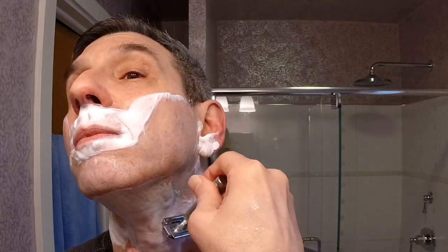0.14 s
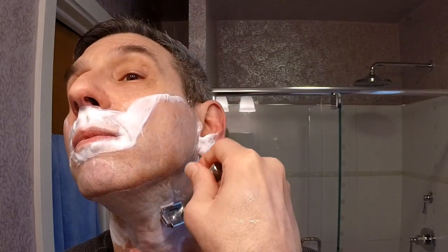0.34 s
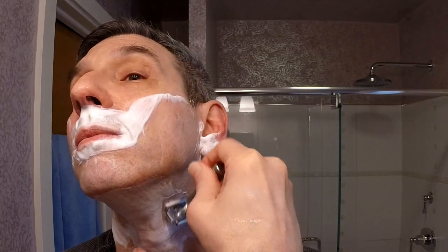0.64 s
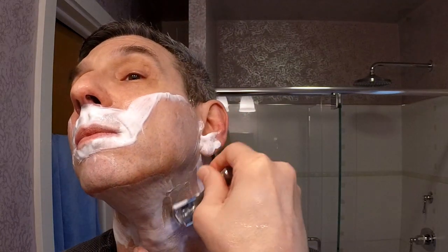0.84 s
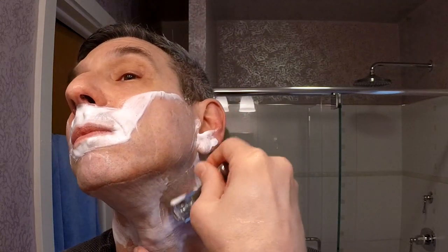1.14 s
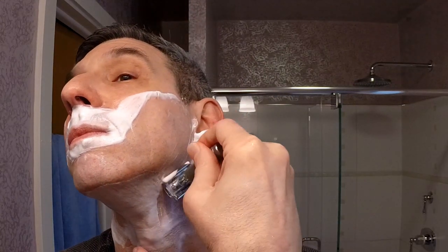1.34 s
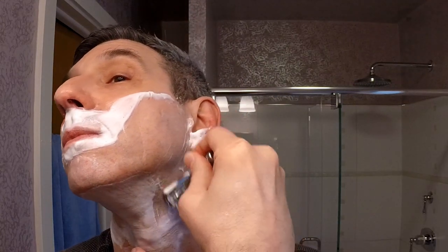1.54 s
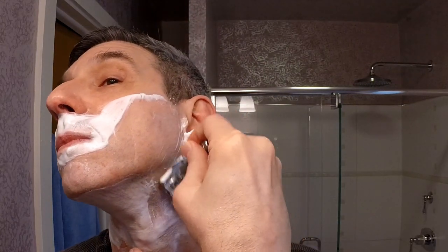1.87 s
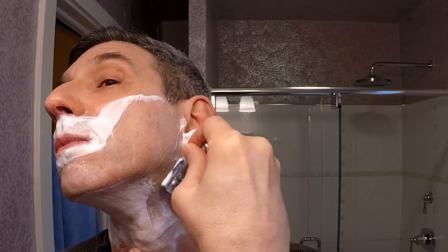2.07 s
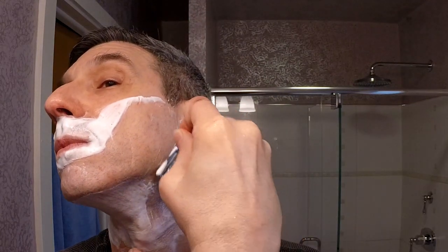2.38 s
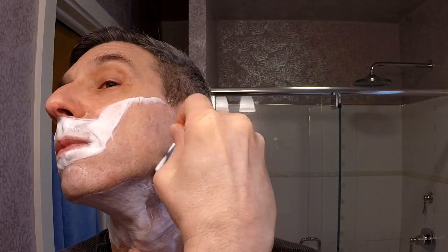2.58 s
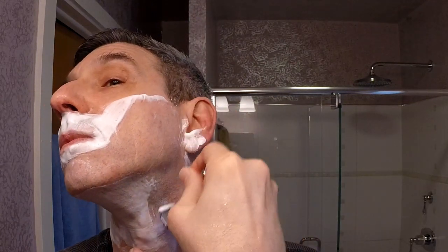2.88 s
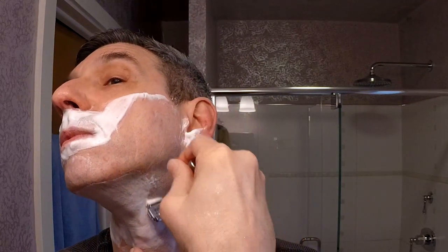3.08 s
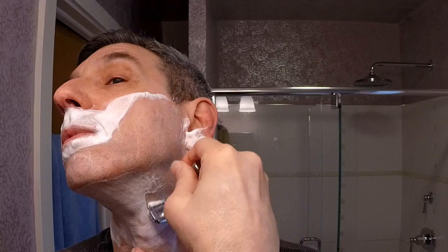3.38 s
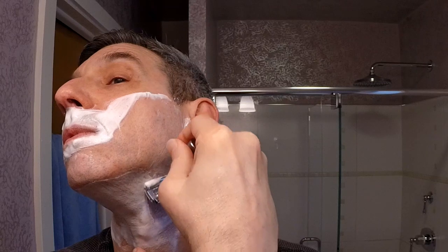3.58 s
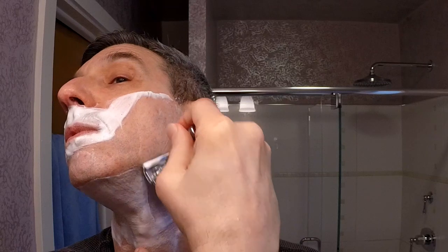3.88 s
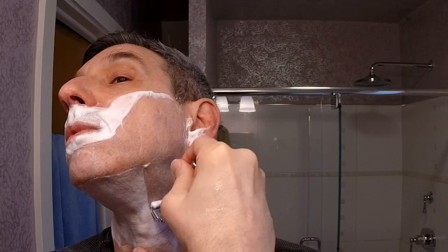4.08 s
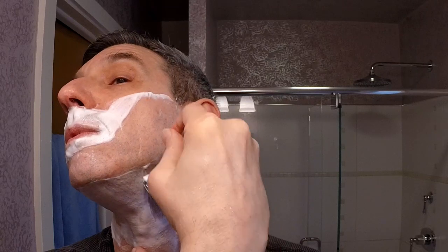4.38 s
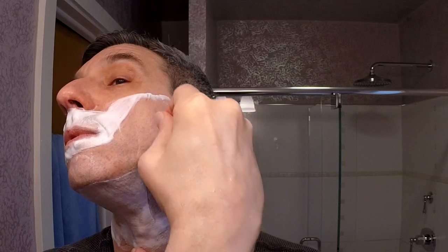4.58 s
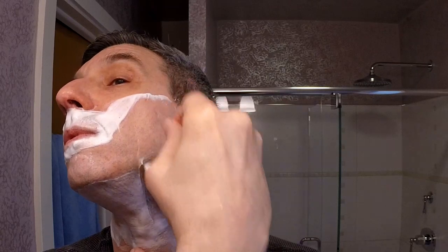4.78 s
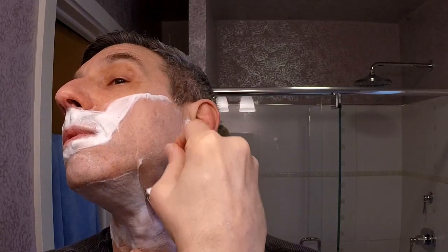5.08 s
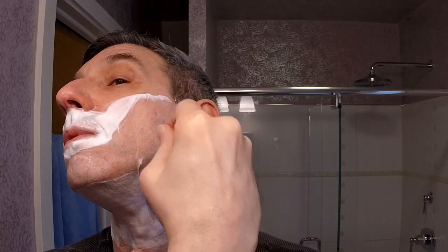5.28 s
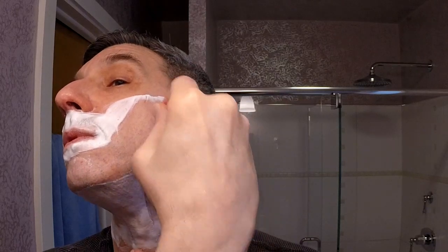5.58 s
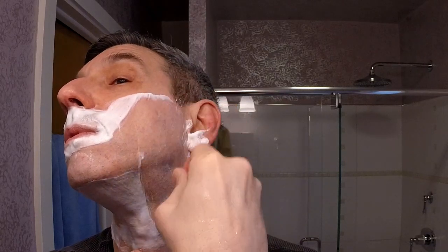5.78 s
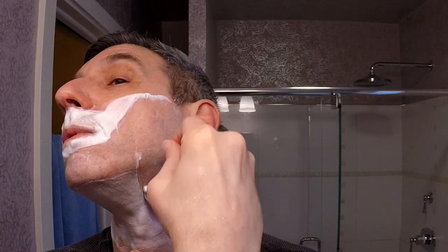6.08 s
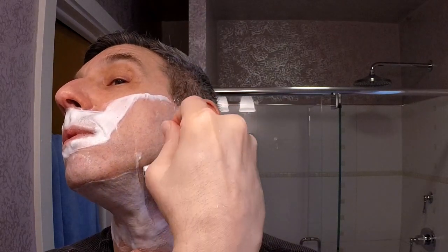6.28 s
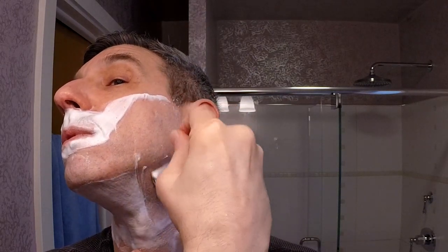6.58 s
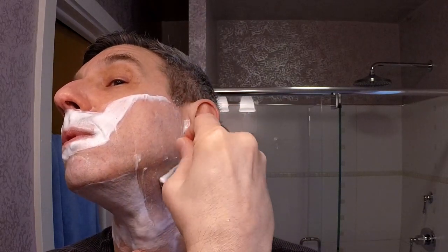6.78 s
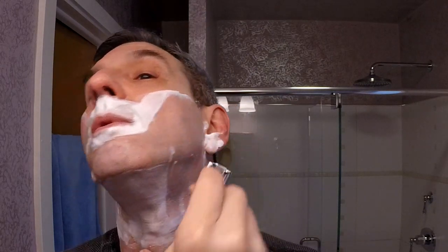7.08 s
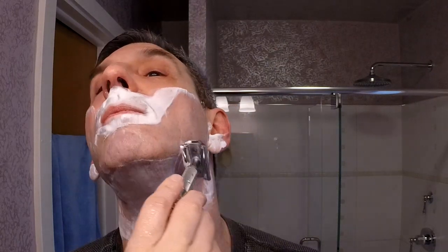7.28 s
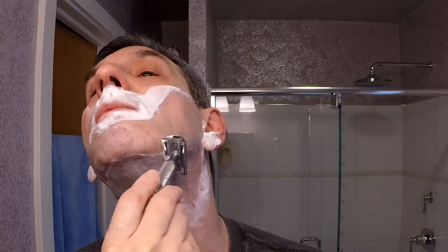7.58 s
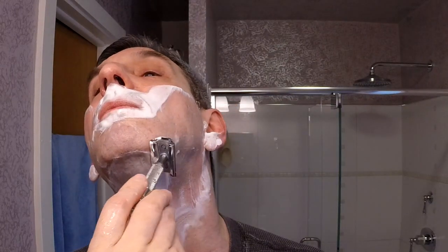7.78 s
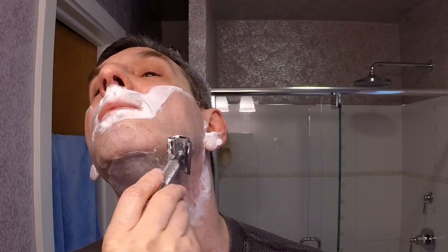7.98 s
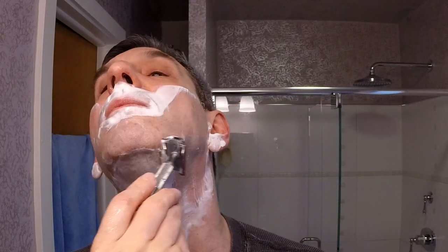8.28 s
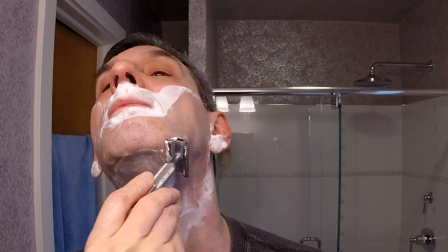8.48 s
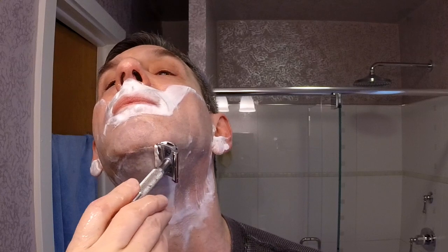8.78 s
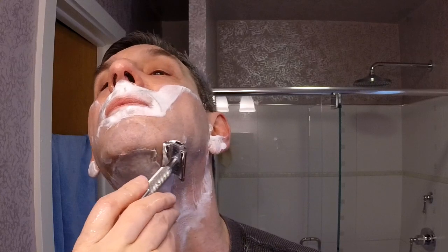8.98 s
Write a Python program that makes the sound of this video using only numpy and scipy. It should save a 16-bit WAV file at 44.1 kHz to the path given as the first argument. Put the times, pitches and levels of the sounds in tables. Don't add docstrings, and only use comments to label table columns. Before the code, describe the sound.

Crisp, dry razor scrapes, quick then drawn out, with tiny hair snaps and soft skin rubbing, over faint fan rumble and hiss in a small bathroom.

```python
import sys
import numpy as np
from scipy import signal
from scipy.fft import rfft, irfft, next_fast_len
from scipy.io import wavfile
from scipy.ndimage import uniform_filter1d, map_coordinates

SR = 44100
rng = np.random.default_rng(int(sys.argv[2]) if len(sys.argv) > 2 else 0)


def undo_db(level):
    steps = np.asarray(level, float) / 20
    return 10 ** steps


def output_pcm(signal):
    pcm = np.clip(np.atleast_2d(signal).T, -1, 1) * 32767
    wavfile.write(sys.argv[1], SR, np.round(pcm).astype(np.int16))


N = 403074
STEP_S = 0.002

# lower edge in Hz, upper edge in Hz.
ZONES_HZ = [(0, 2750), (2750, 4200), (4200, 6300), (6300, 10700), (10700, 30000)]


def unit(x):
    return x / np.sqrt(np.mean(x ** 2) + 1e-20)


def along(points, hz):
    f, v = np.transpose(points)
    return np.interp(np.log(hz + 1), np.log(f + 1), v)


def curves(rows):
    s, *cols = np.transpose(rows)
    return [np.interp(np.arange(N) / SR, s, c) for c in cols]


def per_sample(control):
    return np.interp(np.arange(N) / SR, np.arange(len(control)) * STEP_S, control)


def wobble(rate):
    knots = rng.standard_normal(int(N * rate / SR) + 4)
    return map_coordinates(knots, [np.arange(N) * rate / SR])


def coloured(x, db_at):
    size = 4096
    log_gain = np.log(undo_db(db_at(np.fft.rfftfreq(size, 1 / SR))) + 1e-6)
    cepstrum = irfft(log_gain, size)
    cepstrum[1:size // 2] *= 2
    cepstrum[size // 2 + 1:] = 0
    response = irfft(np.exp(rfft(cepstrum)), size)
    return signal.fftconvolve(x, response / np.linalg.norm(response))[:N]


def noise(spectrum):
    m = next_fast_len(N)
    gain = undo_db(along(spectrum, np.fft.rfftfreq(m, 1 / SR)))
    return unit(irfft(rfft(rng.standard_normal(m)) * gain, m)[:N])


def ventilation():
    # frequency in Hz, density in dB per Hz.
    modes = [(12, -19), (24, 2), (46, -11.5), (60, 5), (80, -9.5), (108, -1.5), (118, -10.5), (132, -2),
             (160, -22.5), (180, -20), (213, -13), (228, -18), (262, -20.5), (279, -16), (340, -27),
             (600, -67)]
    # time in seconds, level in dB.
    flow = [(0.0, -50.5), (0.12, -56), (0.51, -50), (0.97, -52), (1.75, -50.5), (1.83, -49.5), (2.29, -53),
            (5.29, -50), (5.4, -59), (5.55, -52), (6.21, -53.5), (6.69, -48), (6.87, -52.5), (6.95, -48),
            (7.03, -51.5), (8.96, -50.5), (9.14, -51)]
    return undo_db(curves(flow)[0] + 0.4 + 0.4 * wobble(6.5)) * noise(modes)


def microphone_hiss():
    # frequency in Hz, density in dB per Hz.
    hiss_spectrum = [(150, -30), (300, -12), (600, -13.5), (1100, -15.5), (1800, -17.5), (3300, -19.5),
                     (8000, -21.5), (12000, -22), (15400, -23.5)]
    return undo_db(-60.5) * noise(hiss_spectrum)


def port_difference():
    # frequency in Hz, density in dB per Hz.
    port_spectrum = [(12, -10), (20, -1), (66, -4.5), (314, -16), (1300, -23.5), (2020, -26.5),
                     (12000, -26.5), (15400, -39)]
    return undo_db(-71) * noise(port_spectrum)


def stroke(s, length, first_db, last_db, rise_s, fall_db_per_s):
    t = np.arange(0, N / SR, STEP_S) - s
    press = np.interp(t, [0, length], undo_db([first_db, last_db])) * np.clip(t / rise_s, 0, 1)
    return (press * undo_db(-fall_db_per_s * np.maximum(t - length, 0))) ** 2


def skin():
    # start in seconds, length in seconds, level in dB.
    drags = [(.33, 0.17, -61.5), (0.739, 0.059, -55), (1.04, 0.051, -52.5), (1.312, 0.081, -58.5),
             (1.633, 0.074, -58.5), (1.9, 0.08, -63), (2.24, 0.15, -70), (2.478, 0.045, -59),
             (2.707, 0.041, -60.5), (3.18, 0.068, -55), (3.452, 0.45, -58), (4.224, 0.38, -57),
             (5.01, 0.41, -57.5), (5.97, .32, -57.5), (6.617, 0.061, -54.5), (6.97, .32, -61),
             (7.657, 0.065, -57.5), (7.79, 0.066, -59), (8.115, 0.15, -61.5), (8.567, 0.26, -64)]
    # frequency in Hz, density in dB per Hz.
    rub_spectrum = [(150, -19), (280, -3.5), (385, -3.5), (436, 2), (490, -7), (590, -8), (720, -11),
                    (1100, -14.5), (1800, -45)]
    # frequency in Hz, density in dB per Hz.
    hollow_spectrum = [(340, -33), (400, -9), (436, 0.5), (475, -11), (560, -8.5), (620, -17), (700, -36)]
    long_s, grip_s, ease_db_per_s, still_db = 0.25, 0.042, 140, -70
    moves = [(length > long_s, stroke(s, length, db, db, grip_s, ease_db_per_s)) for s, length, db in drags]
    excess = sum(power * undo_db(-6 * slow - 2 * still_db) for slow, power in moves)
    rub_db = still_db + 10 * np.log10(1 + excess)
    hollow = np.sqrt(sum(power for slow, power in moves if slow))
    rub = undo_db(per_sample(rub_db) - 1.6 + 1.0 * wobble(25)) * noise(rub_spectrum)
    return rub + undo_db(-5) * per_sample(hollow) * noise(hollow_spectrum)


def on_bone():
    # start in seconds, end in seconds.
    spans = [
        (7.3, 9.2),
    ]
    return sum((np.arange(N) > a * SR) & (np.arange(N) < b * SR) for a, b in spans) > 0


def pressure_db():
    # landing in seconds, length in seconds, pressure at landing in dB,
    # pressure at lift in dB, blade flatness in dB.
    flicks = [(.43, .03, -63, -61, 4), (.498, 0.055, -49.5, -63, -6), (.72, .05, -68, -60, 4),
              (.76, 0.064, -48, -47, -2), (1.035, .03, -56, -53.5, 3), (1.06, 0.068, -48, -48, 1.5),
              (1.325, 0.097, -54, -49.5, 2), (1.61, 0.087, -66, -49, 1), (1.91, 0.11, -63, -59.5, 4.5),
              (2.22, 0.092, -65, -57.5, 0), (2.47, .07, -78, -49, 0), (2.712, 0.036, -53, -46.5, -7),
              (6.89, 0.041, -67, -64, 4)]
    pulls = [(3.15, 0.12, -67, -53, 4.5), (3.48, .2, -63, -53, 1), (3.553, 0.019, -52, -52, -4),
             (3.66, 0.21, -56, -49, 1), (3.89, 0.058, -48, -48, -0.5), (4.2, 0.095, -66, -49.5, -5),
             (4.3, 0.16, -49.5, -48.5, -3), (4.44, 0.11, -50.5, -49, 1), (4.56, .225, -52, -50, -2),
             (5.06, .04, -70, -65, 3), (5.097, 0.18, -53.5, -49, -1.5), (5.29, .17, -49.5, -53, -0.5),
             (5.46, 0.2, -53, -53.5, 1), (5.62, 0.041, -55, -57, -4), (5.99, 0.1, -70, -60, 2),
             (6.09, 0.088, -51.5, -54.5, -3), (6.19, .12, -51, -52, 1.5), (6.37, 0.051, -53, -57.5, 4),
             (6.618, 0.028, -63, -57, 11.5), (6.64, 0.063, -51, -52.5, 8)]
    jaw_strokes = [
        (7.66, .1, -54, -54.5, 0.5),
        (7.76, 0.1, -54.5, -49, 2),
        (8.12, 0.077, -57, -50, 1.5),
        (8.2, 0.1, -48.5, -50.5, -1),
        (8.54, 0.12, -52.5, -51.5, 0.5),
        (8.66, .11, -59, -52.5, 0),
        (8.77, .08, -55, -53, 1),
        (8.89, 0.027, -69, -71, 2),
    ]
    flick_zones_db = [-16, -9, -7.5, -1.3, 1]
    pull_zones_db = [-16.5, -9, -6, -0.1, 0]
    jaw_zones_db = [-6, -4.5, -4, -0.2, 3]
    flatness_moves = np.array([1.75, 0.64, 0.31, 0.1, -0.29])
    build_s = np.array([0.024, 0.033, 0.016, 0.017, 0.017])[:, None]
    follows = np.array([1.12, 1, 0.9, 1.06, 1.01])[:, None]
    firm_db, lift_db_per_s, rest_db = -49, 278, -75.5
    wander_db, wander_per_s = 1.5, 14
    power = undo_db(rest_db + np.array(pull_zones_db))[:, None] ** 2
    for rows, zones_db in (flicks, flick_zones_db), (pulls, pull_zones_db), (jaw_strokes, jaw_zones_db):
        for *move, flat_db in rows:
            gains = undo_db(np.array(zones_db) + flat_db * flatness_moves)[:, None]
            press = stroke(*move, build_s, lift_db_per_s) / undo_db(2 * firm_db)
            power = power + (gains * undo_db(firm_db)) ** 2 * press ** follows
    return [per_sample(10 * np.log10(zone)) + wander_db * wobble(wander_per_s) for zone in power]


def flutter(blows, t60):
    fade = undo_db(-60 / (t60 * SR))
    power = signal.lfilter([1 - fade ** 2], [1, -fade ** 2], blows ** 2)
    return np.sqrt(np.abs(power)) * rng.standard_normal(N)


def stubble(per_second, spread_db, own_db, top_db, t60, click, glide):
    chance, size, sign = rng.random((3, N))
    clumped_rate = per_second / SR * undo_db(1.5 * wobble(30))
    cut = (chance < clumped_rate) * np.sign(sign - 0.5)
    zones = []
    for _ in ZONES_HZ:
        size_db = -spread_db * np.log(1 - size) + own_db * rng.standard_normal(N)
        zones.append(unit(cut * undo_db(np.minimum(size_db, top_db)) / np.sqrt(per_second)))
    return [unit(click * z + flutter(z, t60) + glide * rng.standard_normal(N)) for z in zones]


def blade(zones, zone_db):
    # frequency in Hz, density in dB per Hz.
    neck_body = [(710, -41), (1200, -22.5), (3310, -7.5), (4560, -6.5), (5070, -5), (6280, -3.5),
                 (7780, -1.5), (14100, 1.5), (15400, 0.5)]
    jaw_body = [(590, -48), (1000, -15), (1770, -7), (2230, -4), (3770, -4), (5020, -4.5), (7070, -9.5),
                (8790, -11), (15400, -10.5)]
    # frequency in Hz, width in Hz, height in dB.
    neck_rings = [(2400, 300, 4), (3200, 700, 5), (5050, 750, 6), (7750, 550, 5), (9100, 600, 4),
                  (11800, 700, 2)]
    jaw_rings = [(1550, 200, 3), (2230, 140, 8), (2890, 120, 5), (3350, 280, 7), (5050, 1000, 8),
                 (8800, 800, 6), (11850, 900, 7), (13400, 550, 5), (14900, 550, 5)]

    def head(body, rings, lo, hi):
        def db_at(hz):
            peaks = sum(db / (1 + (2 * (hz - c) / w) ** 2) for c, w, db in rings)
            band = -10 * np.log10((1 + (lo / (hz + 1)) ** 12) * (1 + (hz / hi) ** 12))
            return along(body, hz) + peaks + band
        return db_at

    on_jaw = on_bone()
    total = np.zeros(N)
    for x, db, zone in zip(zones, zone_db, ZONES_HZ):
        jaw = coloured(x, head(jaw_body, jaw_rings, *zone))
        neck = coloured(x, head(neck_body, neck_rings, *zone))
        total += undo_db(db) * np.where(on_jaw, jaw, neck)
    return total


def crackle():
    even_s, evenness = 0.044, 0.48
    per_second = np.where(on_bone(), 300, 600)
    glide = np.where(on_bone(), 0.55, 0.7)
    hairs = stubble(per_second, 6.2, 3.2, 4.5, 0.012, 0.53, glide)
    local_power = [np.abs(uniform_filter1d(z ** 2, int(even_s * SR))) for z in hairs]
    hairs = [unit(z / power ** (evenness / 2)) for z, power in zip(hairs, local_power)]
    return blade(hairs, pressure_db())


def snaps():
    # time in seconds,
    # peak in dB, dull body against the peak in dB, blade ring against the peak in dB.
    hair_snaps = [(0.448, -38, -16, -8), (0.5037, -25.5, -28, -21), (0.5517, -28, -24, -27),
                  (0.7487, -34, -23, -12), (0.7642, -33, -23, -19), (1.0365, -36, -16, -13),
                  (1.3309, -34, -25, -17), (1.3478, -42, -18, -12), (1.368, -26, -23, -14),
                  (1.6377, -39, -18, -16), (2.0194, -40, -18, -11), (2.0582, -41, -21, -19),
                  (2.1301, -42, -18, -19), (2.2677, -38, -20, -11), (2.3196, -34, -25, -22),
                  (2.5007, -43, -19, -16), (2.7182, -38, -20, -16), (2.7296, -32, -10, -11),
                  (3.1795, -34, -20, -20), (3.215, -32, -14, -13), (3.29, -30, -24, -15),
                  (3.4915, -45, -17, -16), (3.5329, -33, -23, -14), (3.567, -26, -29, -20),
                  (3.6985, -32, -28, -24), (3.7808, -34, -21, -13), (3.896, -32, -23, -8),
                  (4.2253, -40, -7, -8), (4.311, -25, -26, -26), (4.7516, -33, -20, -22),
                  (5.1024, -27.5, -26, -25), (5.3512, -26, -24, -19.5), (5.6594, -25.5, -28, -20),
                  (6.052, -30, -22, -21), (6.0821, -26, -22, -25), (6.099, -26.5, -24, -31),
                  (6.2004, -39, -9, -20), (6.231, -27, -17, -17), (6.3081, -27, -26, -21),
                  (6.3714, -34.5, -10, -12), (6.383, -32.5, -6, -22), (6.4148, -37, -15, -10),
                  (6.6219, -43, -8, -18), (6.6483, -37, -12, -18), (6.6933, -27, -24, -25),
                  (6.9017, -46, -11, -14), (6.9401, -37.5, -23, -14),
                  (7.667, -40, 0, -15), (7.682, -31, -14, -18), (7.7066, -33, -17, -18),
                  (7.7295, -31, -24, -25), (7.8413, -25, -19, -16), (8.128, -41, -1, -8),
                  (8.153, -35, -11, -3), (8.196, -31, -15, -13), (8.218, -33, -17, -6),
                  (8.2402, -26, -20, -16), (8.3294, -33, -22, -20), (8.5447, -34, -15, -11),
                  (8.5939, -28, -20, -13), (8.64, -25, -26, -20), (8.8024, -35, -17, -11),
                  (8.8318, -29, -24, -11), (8.9096, -40, -19, -3), (8.963, -33.5, -24, -23)]
    rows = hair_snaps
    times, peaks_db = np.transpose(rows)[:2]
    blows = np.zeros(N)
    blows[np.round(times * SR).astype(int)] = undo_db(peaks_db + 6)
    _, dull_db, ring_db = curves(rows)
    zones = [0.21 * blows + flutter(blows, 0.018) for _ in ZONES_HZ]
    return blade(zones, [dull_db + 2.5, dull_db + 5.5, ring_db + 7.5, -3.5, -4])


def droplet():
    # time in seconds, frequency in Hz, level in dB, t60 in seconds.
    bursts = [
        (5.672, 4030, -46, .055),
    ]
    t = np.arange(N) / SR
    return sum((t > s) * undo_db(db - 60 * np.abs(t - s) / t60) * np.sin(2 * np.pi * hz * t)
               for s, hz, db, t60 in bursts)


def tiles(x):
    # frequency in Hz, t60 in seconds.
    decay = [(1000, 0.55), (4000, 0.29), (12000, 0.32)]
    hz, t, z = signal.stft(rng.standard_normal(SR // 2), SR, nperseg=256)
    fade = undo_db(-60 * t / along(decay, hz)[:, None])
    tail = signal.istft(z * fade, SR, nperseg=256)[1]
    return signal.fftconvolve(x, tail / np.linalg.norm(tail))[:N]


def scene():
    near = crackle() + snaps() + droplet()
    room = undo_db(-5.5) * tiles(near)
    mid = near + room + skin() + ventilation() + microphone_hiss()
    side = port_difference()
    return np.array([mid + side, mid - side])


def roll_off(x):
    return signal.sosfilt(signal.butter(12, 15750, fs=SR, output="sos"), x)


def record(dry):
    top_hz = 15330
    hz = np.fft.rfftfreq(N, 1 / SR)
    loss_db = np.clip((hz - top_hz) / 3, 0, 45)
    limited = irfft(rfft(dry) * undo_db(-loss_db), N)
    return roll_off(limited)


dry = scene()
out = record(dry)
output_pcm(out)
```